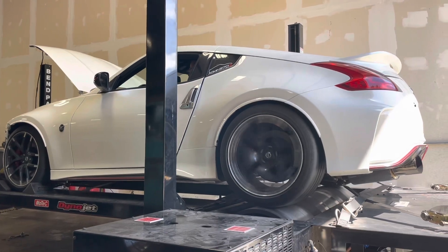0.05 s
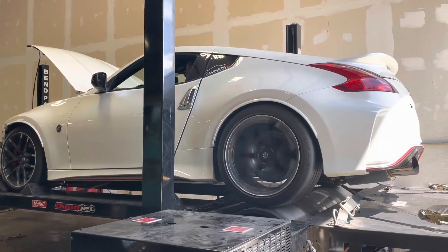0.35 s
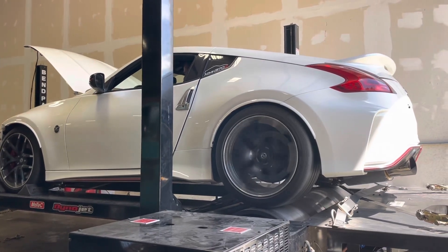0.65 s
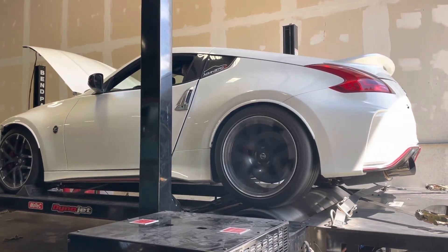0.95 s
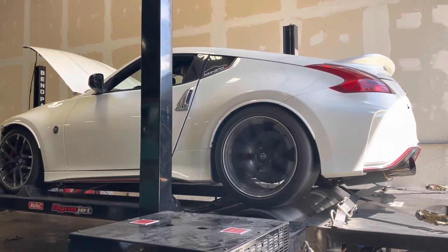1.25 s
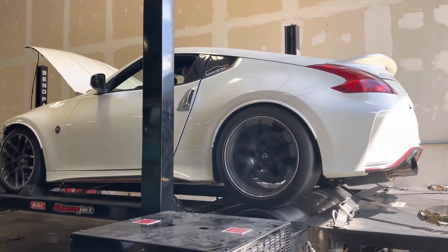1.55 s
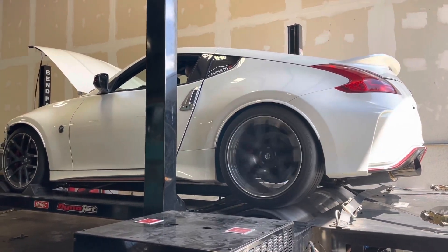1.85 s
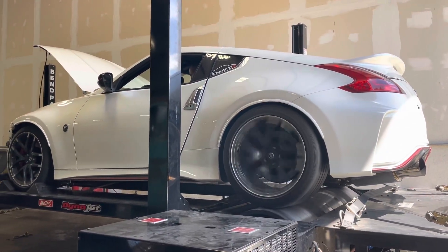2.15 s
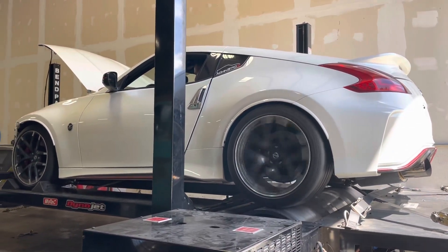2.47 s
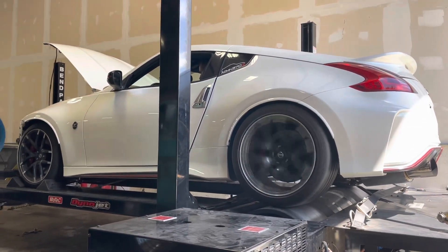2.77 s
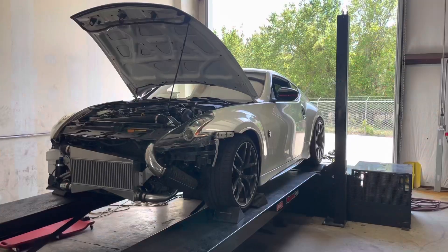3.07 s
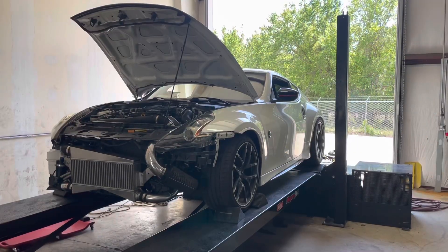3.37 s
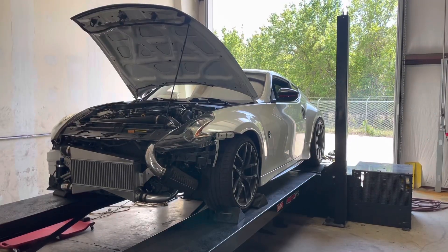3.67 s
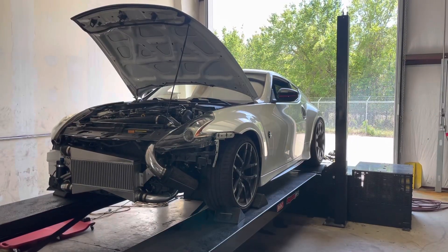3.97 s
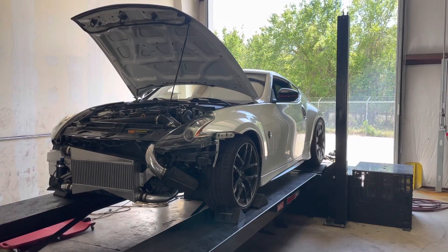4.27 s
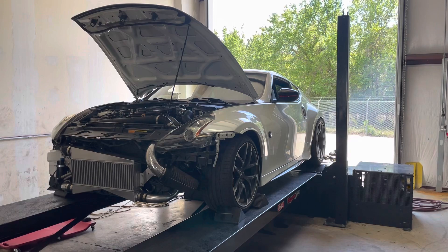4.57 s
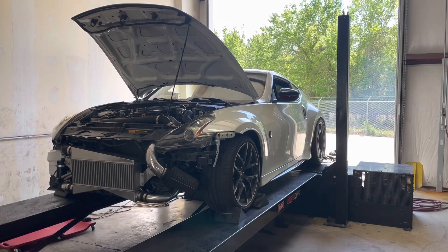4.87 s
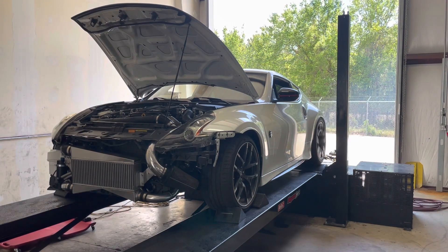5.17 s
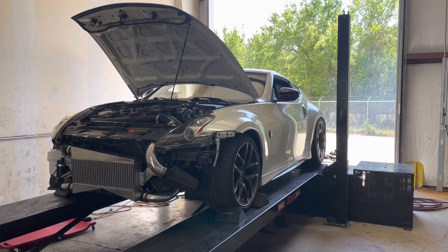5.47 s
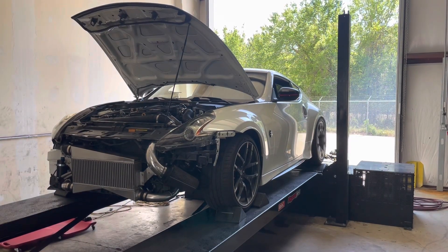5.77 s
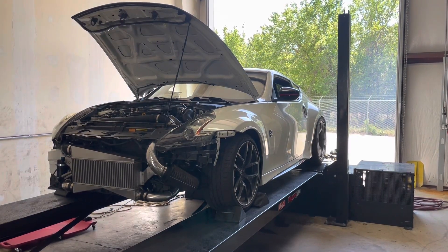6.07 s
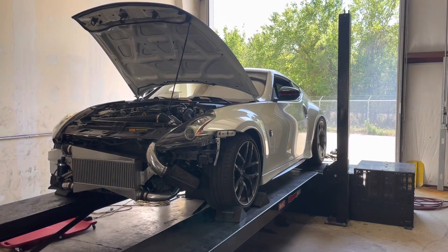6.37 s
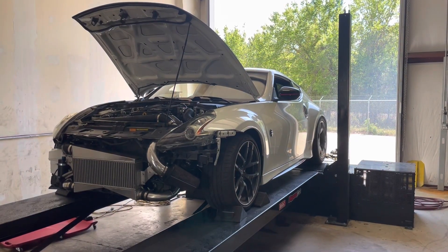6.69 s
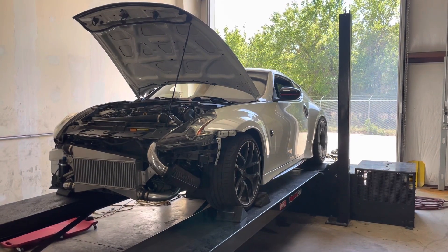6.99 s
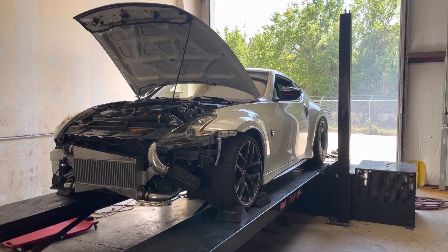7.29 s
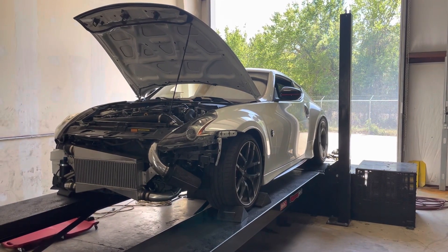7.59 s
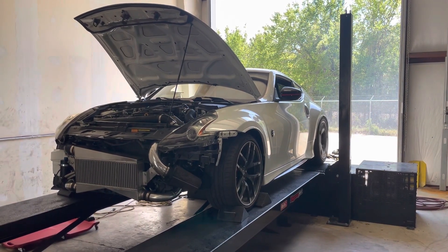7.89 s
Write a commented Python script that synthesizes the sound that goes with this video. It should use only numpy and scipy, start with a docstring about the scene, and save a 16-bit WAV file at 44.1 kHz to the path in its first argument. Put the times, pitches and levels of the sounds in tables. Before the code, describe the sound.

A supercharged car engine winds down on rollers with whining gears, then abruptly roars at full throttle, climbing steadily in pitch.

```python
"""An engine burbles down, throttle closed, while gears whine and tyres whirr: a supercharged six-cylinder
car on a roller dyno in a workshop, heard beside the rear wheel. Then, from the front, a full-throttle
pull: the exhaust note (multiples of the firing rate) climbs through the room's standing waves, unequal
cylinders snarl, the intake hisses and the supercharger's blades whistle. Moving air thumps on the mic."""
import sys
import numpy as np
from scipy import signal
from scipy.fft import rfft, irfft, next_fast_len
from scipy.io import wavfile
from scipy.ndimage import map_coordinates

SR = 44100
rng = np.random.default_rng(int(sys.argv[2]) if len(sys.argv) > 2 else 0)


def log_audio(samples):
    """Write samples as a 16-bit WAV file to the path given in sys.argv[1]."""
    # one column per channel
    frames = np.atleast_2d(samples).T
    # limit to full scale, then quantise
    limited = np.clip(frames, -1, 1)
    pcm = np.round(limited * 32767).astype(np.int16)
    wavfile.write(sys.argv[1], SR, pcm)


N = 350154
CUT_S = 2.866  # rear wheel -> front
REF_HZ = 300  # firing rate at which per-octave slopes are zero

# Left-right likeness of the mic ports, opposite near 9 kHz: f/Hz, correlation (clipped to +-1)
PORT_CORRELATION = [(150, 0.97), (350, 0.53), (700, 0.42), (1400, 0.071), (2800, 0.13), (5000, 0.29),
                    (7000, -0.12), (8800, -1.44), (10500, -0.15), (12500, 1)]
# Room decay: f/Hz, T60/s
ROOM_T60_S = [(100, 0.46), (1000, 0.43), (10000, 0.11)]
# Reverberant share of the note, from crowded modes: f/Hz, level/dB
MODE_RIPPLE_DB = [(300, -26), (600, -13), (900, -7.5), (1500, -5)]
# Standing waves at each viewpoint: f/Hz, sigma/Hz, gain/dB
COAST_MODES = [(151, 7, 5), (175, 6, -10), (197, 11.3, 11), (277, 13, -12), (358, 15, 8), (690, 45, 9),
               (1045, 25, 12)]
PULL_MODES = [(176.5, 3.4, -5), (191.8, 2, -7), (202, 6, 3), (217, 2, -4), (234.5, 3.5, -10.4),
              (247.3, 1, -12), (264, 3.2, 8), (274, 1.7, -6), (292.5, 11.5, 13), (313, 4, -14.5),
              (328.5, 1.5, -7), (335.5, 4.5, 9), (347, 9, 9), (360, 1.2, -11), (364, 2, 4), (370, 1.5, -10),
              (487, 4, -10), (654, 5, 4), (698, 7, 4), (711, 2.5, -18), (748, 4, -7), (766, 5, 8.5),
              (788, 5, 8), (835, 7, 8.5), (864, 6, 4), (884, 6, -10), (963, 5, 11), (992, 7, -8),
              (1054, 7.5, 11.5), (1126, 14, 9), (1185, 10, 8), (1268, 14, -9), (1344, 12, 11),
              (1425, 12, 5), (1465, 9, 4), (1525, 8, 5), (1990, 25, 4), (2145, 20, 5), (2400, 35, -3),
              (2830, 20, 3), (3270, 30, 4)]
# Their depth for sources spread over the car: f/Hz, share
MODE_SHARE = [(400, .15), (850, .55), (1400, .35), (2100, .9)]
# Noise shapes of workshop and gusts: f/Hz, density/dB
SHOP_SHAPE_DB = [(30, -64), (70, -7), (130, -11), (210, -1.5), (290, -16), (480, -18.5), (800, -31),
                 (1150, -15), (1400, -17), (2200, -15.5), (3000, -23.5), (4400, -26.5), (7000, -35.5),
                 (11000, -27), (15500, -34)]
GUST_SHAPE_DB = [(15, -21), (45, 4), (110, 5), (200, -2.5), (400, -9), (1000, -68)]
# Swells of gusts and intake whistle: t/s, sigma/s, level/dB
GUST_SWELLS = [(.3, 0.052, -45), (2.96, 0.045, -33), (3.2, 0.08, -37), (6.648, 0.049, -37),
               (6.984, 0.027, -29), (7.287, 0.026, -28), (7.56, 0.049, -28.5), (7.673, 0.015, -27),
               (7.862, 0.047, -23.5)]
WHISTLE_SWELLS = [(4.65, 0.78, -44.5)]

# Tread pattern: multiple of wheel rate, level/dB
TREAD_DB = [(12, -80), (20, -72), (30, -76), (40, -62), (54, -62), (57, -58.5), (67, -60.5), (76, -66),
            (84, -54), (88, -60), (92, -53), (105, -70)]
# Roller ring: f/Hz, density/dB
ROLLER_SHAPE_DB = [(1000, -14), (1400, -13), (1520, 3), (1720, 4.5), (1900, -19), (2600, -28)]
# Gear mesh rate: t/s, f/Hz
MESH_HZ = [(.6, 6500), (1.2, 6470), (1.6, 6290), (2, 6010), (2.4, 5690), (2.86, 5350)]
# Gear whine: t/s, level/dB
WHINE_DB = [(.6, -67), (1.2, -61), (2, -62), (2.86, -61.5)]
# Its partials: multiple of mesh rate, gain/dB
WHINE_PARTIALS_DB = [(.573, 0), (.747, -5), (1, -2.5), (1.8, -5), (2, 3.5)]
# Supercharger drive: t/s, blade passes per firing
BLADE_RATIO = [(3.6, 28.3), (4.7, 28.1), (5.2, 27.97), (5.8, 27.87), (7, 27.6), (7.94, 26.9)]
# Blade tone through the intake: f/Hz, level/dB
BLADE_DB = [(5300, -68), (7200, -58), (8000, -51), (9300, -52), (10200, -56), (10600, -48), (11200, -55),
            (12000, -49), (13300, -48), (13900, -44), (14800, -43.5), (15700, -51)]
# Noise shapes of intake hiss and exhaust gas: f/Hz, density/dB
COAST_HISS_SHAPE_DB = [(30, -19), (100, -24), (300, 11.5), (700, 5), (1300, 1), (2300, 2), (3000, 4.5),
                       (5000, 0), (7000, 0), (9000, -1), (12000, -6.5), (14500, -5), (16000, -6)]
PULL_HISS_SHAPE_DB = [(300, -16), (1500, -27), (3000, -4.5), (4200, 5), (5200, 4.5), (5600, 0.5),
                      (6000, 5.5), (6800, 6.5), (9000, 6), (12800, 0), (14400, 2.5), (16000, 2)]
COAST_GAS_SHAPE_DB = [(60, -50), (350, -32), (560, 6), (780, -3), (950, -27), (2000, -50)]
PULL_GAS_SHAPE_DB = [(40, -20), (120, -6.5), (300, -4.5), (700, -7), (1200, -9.5), (2200, -6),
                     (3200, -11.5), (5000, -16.5), (9000, -31)]
# Under load, intake hiss (opening surge) and gas roar: t/s, level/dB
HISS_DB = [(2.92, -25.5), (3.18, -26.3), (3.24, -30), (3.45, -28), (3.8, -29.5), (6.35, -31), (6.65, -29.5),
           (6.9, -31), (7.94, -29)]
ROAR_DB = [(3.2, -25), (4.7, -29.5), (5.2, -33.5), (5.35, -31.5), (5.6, -31.5), (6.4, -26), (6.65, -24.5),
           (6.9, -27), (7.94, -25)]

# Firing rate: t/s, f/Hz
COAST_FIRING_HZ = [(0, 362.3), (0.17, 366.3), (0.33, 347.8), (0.66, 278.6), (1, 216.5), (1.5, 156.1),
                   (2.1, 98.3), (2.62, 65.4), (2.86, 63.0)]
PULL_FIRING_HZ = [(2.87, 158.4), (3.15, 165.5), (3.48, 177.0), (4.5, 224.8), (4.78, 237.0), (5.3, 263.9),
                  (5.65, 282.6), (6.9, 346.9), (7.78, 388.8), (7.94, 395.1)]
# Pipe response for cylinder lines: f/Hz, gain/dB
COAST_PIPE_DB = [(50, -64), (110, -55), (150, -46), (200, -45), (270, -44.5), (380, -46), (480, -47),
                 (570, -42), (690, -50), (790, -50.5), (900, -57), (1150, -59), (1600, -63)]
PULL_PIPE_DB = [(50, -29), (100, -5), (150, -1.5), (210, 0), (300, -1), (520, 1), (700, 6), (850, 5),
                (1050, 3), (1350, 3.5), (1700, 1.5), (2200, 2), (2900, 2.5), (3300, 1), (3700, -6)]
# Lines 0, 1/6 .. 5/6 above each firing multiple: gain at low multiples/dB, at high multiples/dB
COAST_UNEVEN_DB = [(-2, 0), (3, 3), (3, 2), (-4, -3), (-7, -6), (-1, -3)]
PULL_UNEVEN_DB = [(8, 2), (2, 5), (-1, 2), (1.5, -4), (-6, -6), (0, -3)]
# Banks cancel or reinforce lines at 2/6, 3/6 .. of the firing rate: gain/dB
COAST_BANKS_DB = [-12, -9, 0, 2, 0, -1, 2.5, 3.5, -2]
PULL_BANKS_DB = [-6, -7.5, -1.5, 3.5, 0, 0, -3]
# Cylinder lines under load: firing rate/Hz, gain/dB
SNARL_DB = [(160, -42.5), (260, -42.7), (330, -43.3), (390, -46)]
# Overrun rasp, dropping abruptly: t/s, gain/dB
RASP_DB = [(0, -5), (.43, -5), (.49, 0), (.85, -1), (1.15, -1), (1.3, -2), (1.38, -8), (1.6, -4), (1.72, 2),
           (1.84, -1), (1.9, -11)]
# Last push of throttle, then it snaps shut: t/s, note gain/dB
THROTTLE_DB = [(0, -7), (.05, 0), (.18, 7), (.415, 6), (.44, -2.5), (1, 0)]
# Exhaust note, all multiples: f/Hz, level/dB
COAST_NOTE_DB = [(63, -56), (85, -37), (130, -38), (230, -42.5), (330, -39.5), (400, -41.5), (500, -45),
                 (700, -41), (1100, -47)]
PULL_NOTE_DB = [(160, -10.4), (220, -13.8), (300, -25), (370, -28.5), (420, -25.3), (540, -24.5),
                (615, -29), (675, -21.5), (730, -26), (900, -32), (1600, -36.5)]
# Firing multiples 1, 2 ..: gain/dB, slope/(dB per octave of speed)
COAST_ORDERS_DB = [(0, 0), (-7, -.3), (-12, 4)]
PULL_ORDERS_DB = [(-.8, -2), (1.1, 2), (-.8, 1), (-2, 0), (-6, -2.5)]


def amp(db):
    """dB to gain."""
    return 10 ** (np.asarray(db) / 20)


def unit(x):
    """Scale to rms 1."""
    return x / np.sqrt(np.mean(x ** 2) + 1e-20)


def along(points, hz):
    """Interpolate (f, value) points on a log axis."""
    f, values = np.transpose(points)
    return np.interp(np.log(hz + 1), np.log(f + 1), values)


def curve(points):
    """Interpolate (t, value) points per sample."""
    return np.interp(np.arange(N) / SR, *np.transpose(points))


def bells(rows, x):
    """One Gaussian of height 1 per (centre, sigma, dB) row."""
    return [np.exp(-.5 * ((x - centre) / sigma) ** 2) for centre, sigma, _ in rows]


def swells(rows):
    """Gain over time of Gaussian swells."""
    return sum(amp(row[2]) * bell for row, bell in zip(rows, bells(rows, np.arange(N) / SR)))


def wobble(rate_hz):
    """Smooth random curve, rate_hz knots a second."""
    coarse = np.arange(0, N + 64, 64)
    knots = rng.standard_normal(4096)
    return np.interp(np.arange(N), coarse, map_coordinates(knots, [coarse * rate_hz / SR], mode="wrap"))


def angle(hz):
    """Running phase/rad."""
    return 2 * np.pi * np.cumsum(hz) / SR


def tone(phase):
    """Sine, rms 1, random start."""
    return np.sqrt(2) * np.sin(phase + rng.uniform(0, 2 * np.pi))


def filtered(x, response):
    """Apply a zero-phase frequency response."""
    size = next_fast_len(N + SR // 2)
    return irfft(rfft(x, size) * response(np.fft.rfftfreq(size, 1 / SR)), size)[..., :N]


def ports(pair):
    """Two unrelated signals to left and right, correlated as at the mic ports."""
    turn = lambda hz: np.arccos(np.clip(along(PORT_CORRELATION, hz), -1, 1)) / 2
    mid, side = filtered(pair, lambda hz: np.array([np.cos(turn(hz)), np.sin(turn(hz))]))
    return np.array([mid + side, mid - side])


def rush(shape_db):
    """Shaped stereo noise, rms 1."""
    return unit(ports(filtered(rng.standard_normal((2, N)), lambda hz: amp(along(shape_db, hz)))))


def room(x):
    """Diffuse reverberation at two points; treble dies first."""
    hz, t, noise = signal.stft(rng.standard_normal((2, SR // 2)), SR, nperseg=256)
    decay = amp(-60 * t / along(ROOM_T60_S, hz)[:, None])
    tail = signal.istft(noise * decay, SR, nperseg=256)[1]
    return signal.fftconvolve(x[None], tail / np.linalg.norm(tail[0]), axes=1)[:, :N]


def standing_waves_db(modes, hz):
    """Room modes swell or dip a tone at hz."""
    grid_hz = np.arange(SR // 2)
    return np.interp(hz, grid_hz, sum(row[2] * bell for row, bell in zip(modes, bells(modes, grid_hz))))


def workshop():
    """Steady background noise."""
    return amp(-42.5) * rush(SHOP_SHAPE_DB)


def buffeting():
    """Moving air thumps on the mic."""
    return swells(GUST_SWELLS) * rush(GUST_SHAPE_DB)


def tyre(turns, size=4096, count=110):
    """Uneven tread blocks hit the roller in the same order each turn: close lines."""
    lines = amp(along(TREAD_DB, np.arange(count))) * np.exp(2j * np.pi * rng.random(count))
    one_turn = irfft(lines, size) * size / np.sqrt(2)
    return np.interp(turns % 1, np.arange(size) / size, one_turn)


def drivetrain(meshes_per_turn=226):
    """Gear whine and tyre whirr fall as the wheels coast on the ringing roller."""
    hz, whine_db = curve(MESH_HZ), curve(WHINE_DB)
    mesh = angle(hz * (1 + .004 * wobble(200)))
    whine = sum(amp(whine_db + db + 3 * wobble(17)) * tone(k * mesh) for k, db in WHINE_PARTIALS_DB)
    turns = mesh / (2 * np.pi * meshes_per_turn)
    tyres = ports(np.array([tyre(turns), tyre(turns)]))
    whirr = filtered(tyres, lambda f: amp(along(ROLLER_SHAPE_DB, f) / 2))
    ring = amp(-53) * rush(ROLLER_SHAPE_DB)
    slowing = amp(5 * np.log2(hz / hz[0]))
    return whine + slowing * (whirr + ring)


def supercharger(duct_hz=6110, half_width_hz=70):
    """Blade tone and octave follow the engine, less belt slip; turbulence rings one duct resonance."""
    blade_hz = curve(PULL_FIRING_HZ) * curve(BLADE_RATIO)
    phase = angle(blade_hz * (1 + .003 * wobble(300)))
    blades = lambda: sum(amp(along(BLADE_DB, k * blade_hz)) * tone(k * phase) for k in (1, 2))
    whine = np.array([amp(2.8 * wobble(16)) * blades() for _ in range(2)])
    duct = filtered(rng.standard_normal(N), lambda f: 1 / (1 + ((f - duct_hz) / half_width_hz) ** 2))
    return ports(whine) + swells(WHISTLE_SWELLS) * unit(duct)


def crank(hz, jitter_rad, jitter_hz):
    """Firing phase; no two combustions push alike."""
    return angle(hz) + jitter_rad * wobble(jitter_hz)


def gas_flow(firing, shape_db, depth, lope):
    """Gas noise: one puff per firing, one lope per six."""
    return rush(shape_db) * unit(1 + depth * np.cos(firing) + lope * np.cos(firing / 6))


def bank_throb(firing, hz, pipe_hz=101, half_width_hz=14):
    """One bank, at half the firing rate, booms in a pipe resonance."""
    return amp(-32) / (1 + ((hz / 2 - pipe_hz) / half_width_hz) ** 2) * tone(firing / 2)


def cylinders(firing, hz, pipe_db, uneven_db, banks_db, skip_orders, fade_db, rough_rad, wet_db, count):
    """Six unequal cylinders repeat every sixth firing: lines 1/6 of the firing rate apart."""
    lines = np.zeros(N)
    for k in range(2, count):
        whole, sixth = divmod(k, 6)
        if sixth == 0 and whole <= skip_orders:  # left to exhaust_note
            continue
        order = k / 6
        scatter = rough_rad * order * wobble(70)  # timing differences smear high orders into a rasp
        db = along(pipe_db, order * hz) - 1.1 * order
        db += np.interp(order, [4.5, 8], uneven_db[sixth])
        db += banks_db[k - 2] if k - 2 < len(banks_db) else 0
        lines += amp(db + fade_db * wobble(4.1)) * tone(order * firing + scatter)
    return lines + amp(wet_db) * ports(room(lines))


def exhaust_note(firing, hz, note_db, orders_db, modes, flutter_db, waver_rad, spread=.16):
    """Clean low firing multiples glide through the room modes, slightly unlike at each port."""
    mid, side = np.zeros((2, N))
    for k, (own_db, db_per_octave) in enumerate(orders_db, 1):
        db = own_db + db_per_octave * np.log2(hz / REF_HZ)
        db += along(note_db, k * hz) + standing_waves_db(modes, k * hz)
        gain = amp(db + flutter_db * wobble(40))
        mid += gain * tone(k * firing + waver_rad * (k - 1) * wobble(30))
        side += gain * spread * np.sqrt(k) * wobble(7.2) * tone(k * firing)
    ripple = filtered(ports(room(mid)), lambda f: amp(along(MODE_RIPPLE_DB, f)))
    return np.array([mid + side, mid - side]) + ripple


def engine_coast(build_db=5.5, build_s=.31, sputter_db=2.5, rasp_above_hz=270):
    """Throttle closes: the note falls, uneven firing burbles, intake hiss fades with speed."""
    hz = curve(COAST_FIRING_HZ)
    octaves = np.log2(hz / REF_HZ)
    onset_db = -build_db * np.clip(1 - np.arange(N) / SR / build_s, 0, 1)
    lines_db = .8 + 10 * octaves + onset_db
    hiss_db = -31.5 + 12.5 * octaves + onset_db
    firing = crank(hz, jitter_rad=.063, jitter_hz=73)
    note = exhaust_note(firing, hz, COAST_NOTE_DB, COAST_ORDERS_DB, COAST_MODES,
                        flutter_db=1.8, waver_rad=.2)
    lines = cylinders(firing, hz, COAST_PIPE_DB, COAST_UNEVEN_DB, COAST_BANKS_DB,
                      skip_orders=2, fade_db=3, rough_rad=.09, wet_db=-7, count=42)
    lines = filtered(lines, lambda f: amp(standing_waves_db(COAST_MODES, f)))
    burble = amp(lines_db + sputter_db * wobble(26)) * lines
    boom = filtered(burble, lambda f: 1 / (1 + (f / rasp_above_hz) ** 8))
    gas = amp(-46.5) * gas_flow(firing, COAST_GAS_SHAPE_DB, depth=.34, lope=.7)
    rasp = amp(curve(RASP_DB)) * (burble - boom + gas)
    hiss = amp(hiss_db) * gas_flow(firing, COAST_HISS_SHAPE_DB, depth=.1, lope=.049)
    return amp(curve(THROTTLE_DB)) * note + boom + rasp + hiss


def engine_pull():
    """Full throttle: climbing note, cylinder snarl, pulsing gas roar, intake hiss."""
    hz = curve(PULL_FIRING_HZ)
    hiss_db = curve(HISS_DB) + .3 * wobble(14)
    firing = crank(hz, jitter_rad=.04, jitter_hz=46)
    note = exhaust_note(firing, hz, PULL_NOTE_DB, PULL_ORDERS_DB, PULL_MODES,
                        flutter_db=1.5, waver_rad=.12)
    throb = bank_throb(firing, hz)
    lines = cylinders(firing, hz, PULL_PIPE_DB, PULL_UNEVEN_DB, PULL_BANKS_DB,
                      skip_orders=5, fade_db=2.5, rough_rad=.06, wet_db=-2, count=78)
    snarl = amp(along(SNARL_DB, hz)) * lines
    roar = amp(curve(ROAR_DB)) * gas_flow(firing, PULL_GAS_SHAPE_DB, depth=.2, lope=.08)
    hiss = amp(hiss_db) * gas_flow(firing, PULL_HISS_SHAPE_DB, depth=.05, lope=.064)
    mode_gain = lambda f: amp(along(MODE_SHARE, f) * standing_waves_db(PULL_MODES, f))
    return note + throb + filtered(snarl + roar, mode_gain) + hiss


def scene():
    """Rear viewpoint ends abruptly; front fades in fast."""
    t = np.arange(N) / SR
    rear_gain = np.clip((CUT_S - t) / .025, 0, 1)
    front_gain = np.clip((t - CUT_S - .006) / .033, 0, 1)
    rear = engine_coast() + workshop() + drivetrain()
    front = engine_pull() + supercharger()
    return rear_gain * rear + front_gain * front + buffeting()


def record(dry):
    """Ports differ slightly in colour; peaks round off; the band ends steeply."""
    lean_db = lambda hz: along([(150, 0.5), (700, -3.0), (1500, -0.5), (5500, 3.0), (10000, -0.5)], hz)
    coloured = filtered(dry, lambda hz: amp(np.array([lean_db(hz), -lean_db(hz)]) / 2))
    rounded = coloured / (1 + np.abs(coloured) ** 8) ** (1 / 8)
    return filtered(rounded, lambda hz: hz < 15780)


dry = scene()
out = record(dry)
log_audio(out)
```